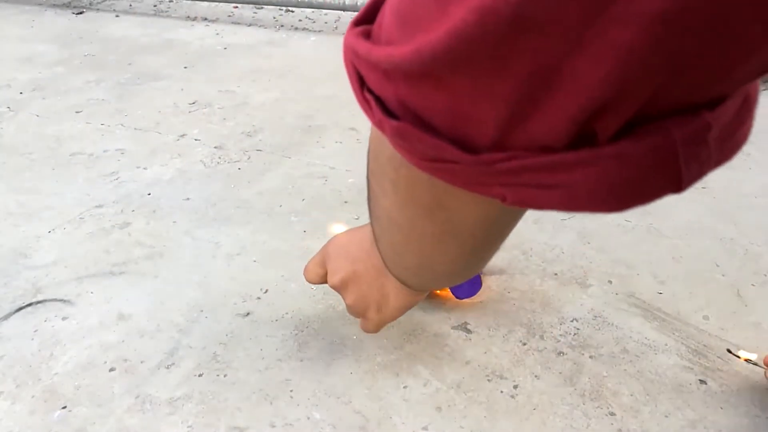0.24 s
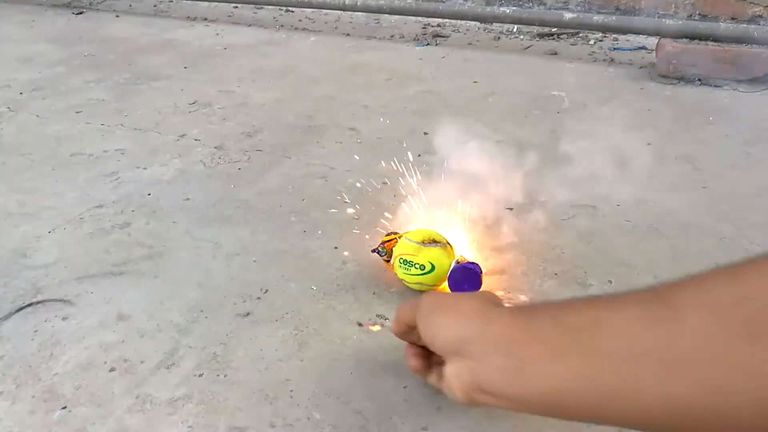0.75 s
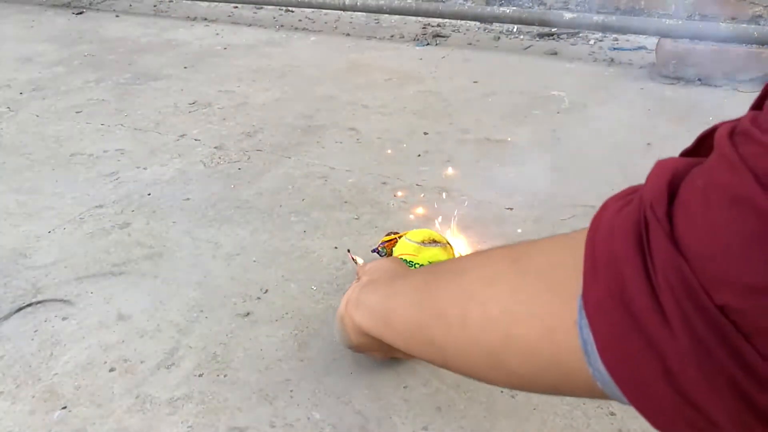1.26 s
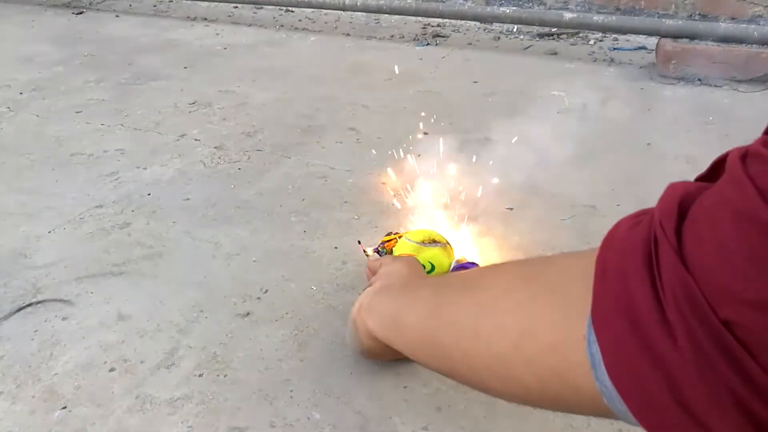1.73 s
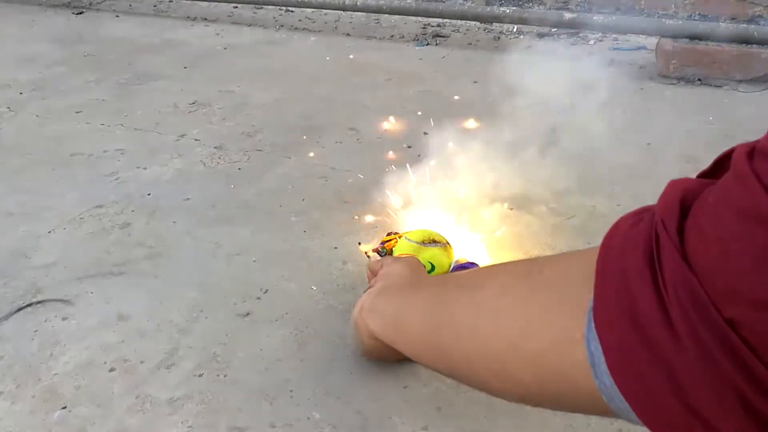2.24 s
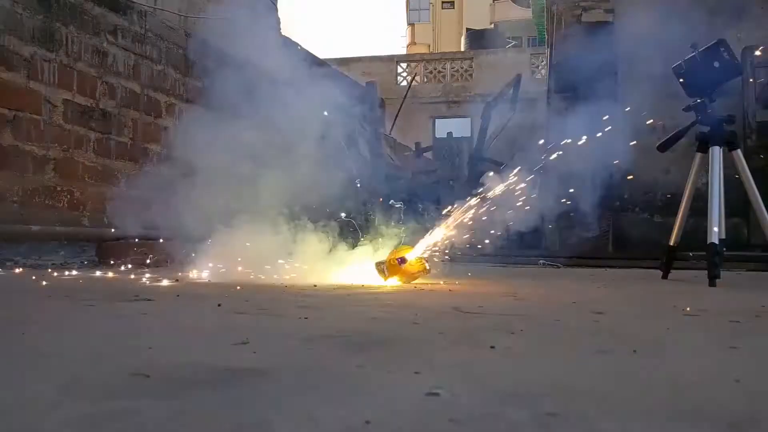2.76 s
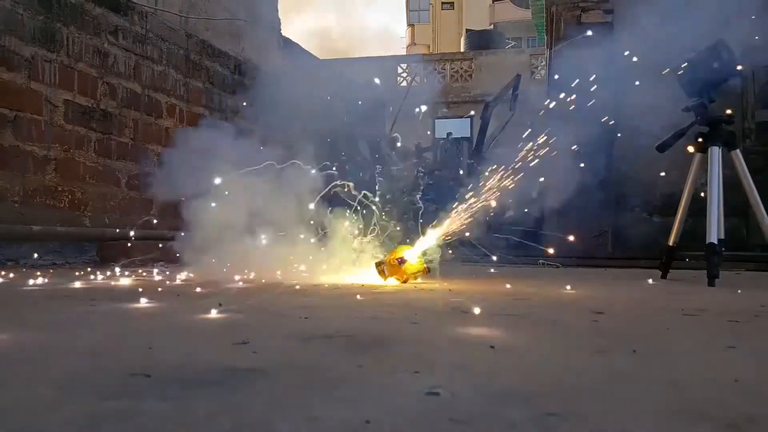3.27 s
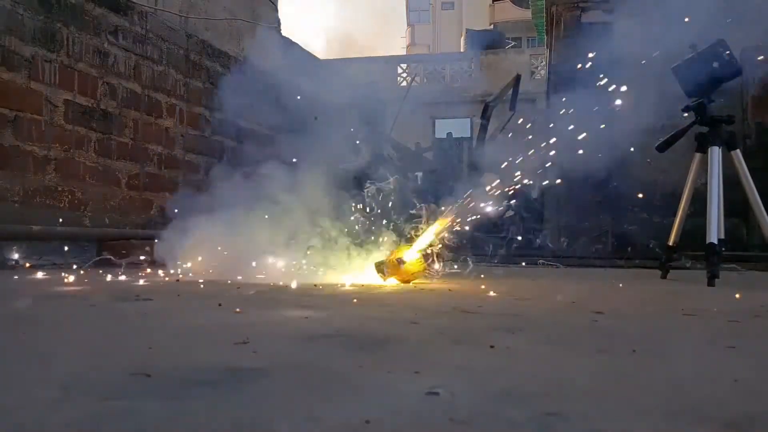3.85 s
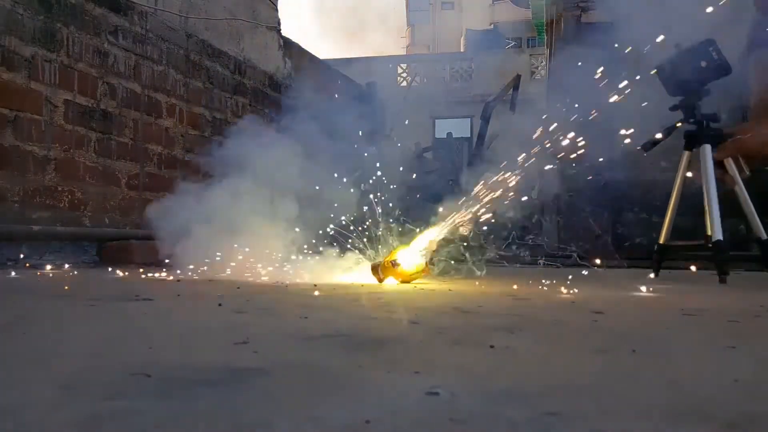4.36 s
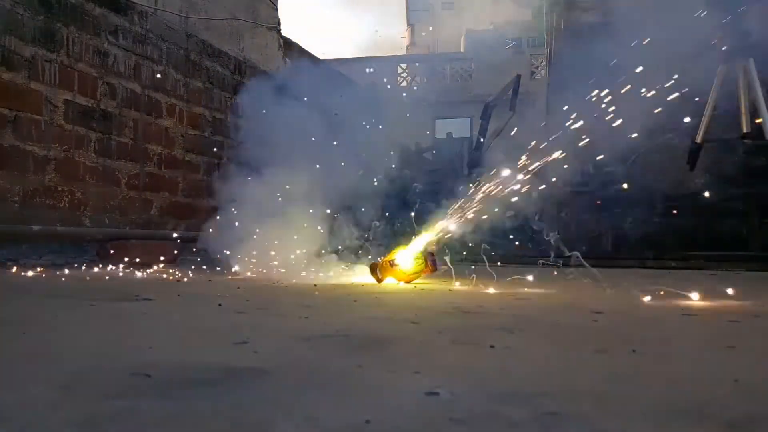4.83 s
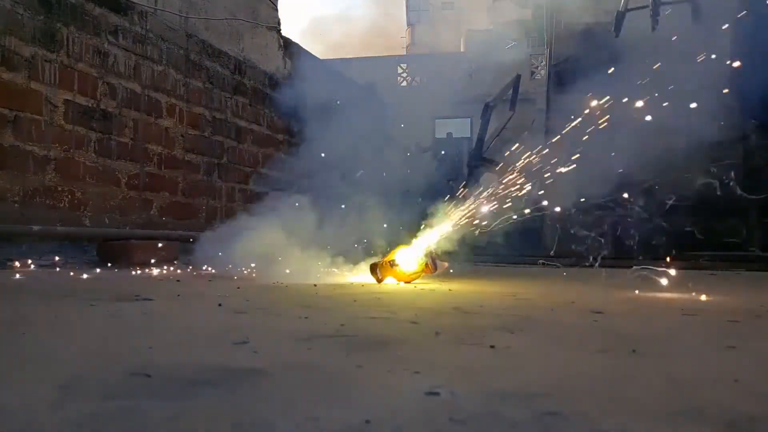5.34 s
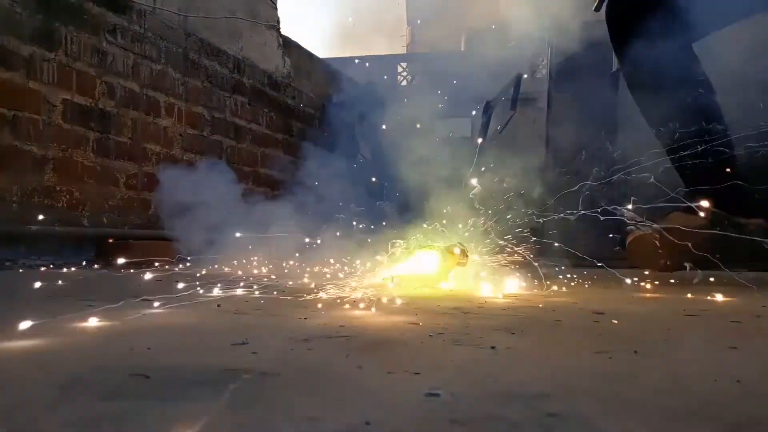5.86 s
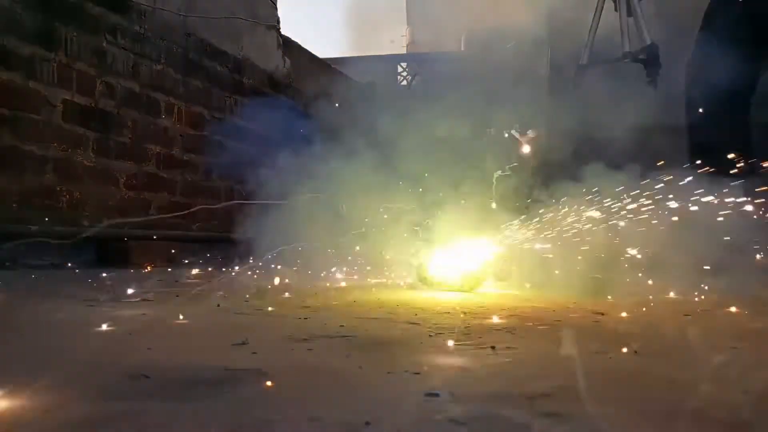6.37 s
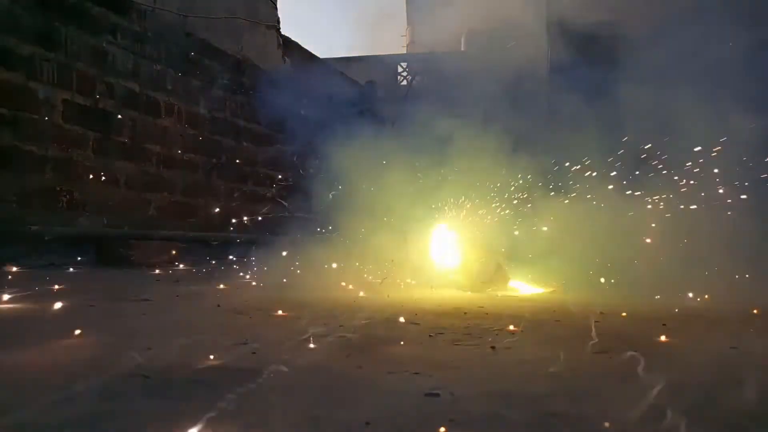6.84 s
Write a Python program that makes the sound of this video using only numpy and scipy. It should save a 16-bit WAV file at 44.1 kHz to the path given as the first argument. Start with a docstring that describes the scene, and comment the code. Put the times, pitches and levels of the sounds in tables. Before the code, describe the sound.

Close outdoors over concrete, a fuse fizzes quietly and a small firework's priming flares in soft, fluttering, raspy puffs that grow stronger. It stops abruptly for a fifth of a second. Then a much louder jet roars and hisses near floor level in a walled yard, with sharp spark snaps. At the end the case tips over and spins, its hiss swishing past the microphone.

```python
"""Quiet outdoor air and a fizzing fuse come first, then the priming of a small firework flares in puffs.
The flame is noise and grain clicks, shaped into bands that rise and fall with each flare.
After a short silence the full jet roars and hisses at floor level: noise bands driven by thrust.
Sparks snap as tiny shocks with dying rings, before and after the silence.
At last the case tips over and spins: a sliding echo makes the jet swish, and its hiss swings past."""
import sys
import numpy as np
from scipy import signal
from scipy.fft import rfft, irfft, next_fast_len
from scipy.io import wavfile
from scipy.ndimage import map_coordinates

SR = 44100
rng = np.random.default_rng(int(sys.argv[2]) if len(sys.argv) > 2 else 0)


def store_pcm(level_fs):
    """Save levels as 16-bit WAV."""
    pcm = np.round(np.clip(level_fs, -1, 1) * 32767).astype(np.int16)
    wavfile.write(sys.argv[1], SR, np.atleast_2d(pcm).T)


N = 313110
LENGTH = next_fast_len(N)
TIME = np.arange(N) / SR
BINS = np.fft.rfftfreq(LENGTH, 1 / SR)  # frequencies in Hz
TIP_S = 5.82  # the case tips over and starts to skid


def gain_of(db):
    """Turns decibels into a plain multiplier."""
    return np.exp(np.asarray(db) * (np.log(10) / 20))


def evened(x):
    """Scales a sound to an average strength (rms) of 1."""
    return x / np.sqrt(np.mean(x ** 2) + 1e-20)


def read(points, hz):
    """Joins (Hz, value) points by straight lines on a log-frequency axis."""
    f, value = np.transpose(points)
    return np.interp(np.log(hz + 1), np.log(f + 1), value)


def curve(points):
    """Joins (s, value) points by straight lines in time."""
    s, value = np.transpose(points)
    return np.interp(TIME, s, value)


def swells(rows):
    """Sums a bell for each (s, length at half height s, height, ..) row; one curve per height column."""
    total = 0
    for s, length, *heights in rows:
        bell = .5 ** ((2 * (TIME - s) / length) ** 2)
        total = total + np.outer(heights, bell)
    return total


def lifted(peaks):
    """Sums (Hz, width Hz, dB) resonances into one lift in dB over all frequencies."""
    return sum(db / (1 + (2 * (BINS - hz) / width) ** 2) for hz, width, db in peaks)


def add(mix, s, sound):
    """Mixes a sound in at time s."""
    part = mix[round(s * SR):][:len(sound)]
    part += sound[:len(part)]


def coloured(x, spectrum, lift_db=0):
    """Filters x by a spectrum and a lift, then scales it to rms 1."""
    gain = gain_of(read(spectrum, BINS) + lift_db)
    return evened(irfft(rfft(x, LENGTH) * gain, LENGTH)[:N])


def waver(rate_hz):
    """Random motion of about rms 1, weak below 6 Hz and fading above rate_hz."""
    step = 32  # one value per 32 samples is enough for slow motion
    t = TIME[::step]
    hz = np.fft.rfftfreq(len(t), step / SR)
    band = hz ** 2 / (hz ** 2 + 6 ** 2) / np.sqrt(1 + (hz / rate_hz) ** 3)
    motion = irfft(rfft(rng.standard_normal(len(t))) * band, len(t))
    return np.interp(TIME, t, evened(motion))


def crackle(per_s, spread_db):
    """Clicks of burning grains at random times; a large spread_db makes a few stand out."""
    count = int(per_s * N / SR)
    place, rarity, sign = rng.random((20000, 3))[:count].T  # at most 20000 clicks in all
    size = gain_of(-spread_db * np.log(rarity + .01))
    return evened(np.bincount((place * N).astype(int), size * np.sign(sign - .5), N))


def gas(grain, per_s, spread_db):
    """Turbulent gas is white noise, here with a share of grain clicks in it."""
    return evened(rng.standard_normal(N) + grain * crackle(per_s, spread_db))


def ring(t, hz, t60):
    """A struck resonance: one tone that dies by 60 dB in t60 seconds."""
    return np.sin(2 * np.pi * hz * t) * np.exp(-np.log(1000) * t / t60)


def yard(x, wet_db):
    """Early echoes off floor and walls, then a short open-air tail of scattered reflections."""
    # Echoes off floor and walls: delay_s [s], gain [times the direct sound]
    echoes = [(.0009, 0.11), (.00275, 0.051), (.0054, 0.088), (.0079, .07), (0.011, .13)]
    # How long the tail takes to die by 60 dB: pitch_hz [Hz], t60_s [s]
    tail_times = [(200, 0.19), (2000, 0.25), (7000, 0.07), (15000, 0.52)]
    t = np.arange(SR // 4) / SR
    taps = rng.choice([-1., 1.], len(t)) * (rng.random(len(t)) < .08) * (t > .004)
    # each frequency band of the tail dies at its own speed
    hz, s, z = signal.stft(taps, SR, nperseg=256)
    decay = gain_of(-60 * s / read(tail_times, hz)[:, None])
    tail = signal.istft(z * decay, SR)[1]
    response = gain_of(wet_db) * tail / np.linalg.norm(tail)
    response[0] += 1  # direct sound
    for delay, gain in echoes:
        response[round(delay * SR)] += gain
    return signal.oaconvolve(x, response / np.linalg.norm(response))[:N]


def spread(a, b):
    """Two unrelated sounds become a left-right pair that is partly alike."""
    # Likeness of left and right: pitch_hz [Hz], likeness [1 = same, 0 or less = unrelated]
    likeness = [(60, 0.91), (150, 1), (380, 0.86), (950, 0.36), (2380, 0.47), (5980, 0.22), (15000, -0.15)]
    # Balance of left against right: pitch_hz [Hz], left_over_right_db [dB]
    balance = [(60, -2.5), (180, 2.5), (550, -6.5), (1650, 0.5), (4970, 4), (15000, 6)]
    same = np.clip(read(likeness, BINS), 0, 1)
    lean_db = read(balance, BINS)
    mid = rfft(a, LENGTH)
    side = rfft(b, LENGTH) * np.sqrt((1 - same) / (1 + same))
    left = (mid + side) * gain_of(lean_db / 2)
    right = (mid - side) * gain_of(-lean_db / 2)
    return irfft(np.array([left, right]), LENGTH)[:, :N]


def flame_gains():
    """Flutter, rasp and fizz of the flame: each flare swells, holds and dies back to the embers."""
    # The priming flares up, at last for good: start_s [s], attack_s [s], hold_s [s], release_s [s],
    # flutter_level_db [dB], rasp_over_flutter_db [dB], fizz_over_flutter_db [dB]
    flares = [(0.24, 0.29, 0.13, .16, -49.5, -21, -10.5), (0.475, 0.098, .005, 0.03, -40, -4.5, -8),
              (0.58, 0.05, .003, 0.018, -34.5, -2, -16), (0.953, .035, .02, 0.13, -53, -1.5, -20),
              (1.02, 0.073, .02, .08, -49.5, -1, -25), (1.202, 0.013, .02, 0.044, -42.5, -2, -29),
              (1.222, 0.058, .005, 0.042, -35, -3, -19.5), (1.293, 0.066, .02, .07, -43.5, -4, -27),
              (1.367, 0.17, 0.02, 0.19, -32.5, 1.5, -16.5), (1.60, 0.079, 0.03, 0.14, -38.5, -2.5, -18.5),
              (1.863, 0.11, 0.067, 0.052, -34.5, 4, -13), (2.03, 0.069, 0.069, .07, -33.5, -2, -16.5),
              (2.135, 0.09, .35, 0.028, -31, 0.5, -14)]
    kindle_s = 0.54  # time that the embers take to start glowing
    embers_db = [-59, -61, -75]  # flutter, rasp and fizz between flares
    lit = np.minimum(TIME / kindle_s, 1) ** 2
    power = np.outer(gain_of(embers_db), lit) ** 2
    for start, attack, hold, release, db, rasp_db, fizz_db in flares:
        rise = (TIME - start) / attack
        fall = 1 - (TIME - start - attack - hold) / release
        opening = np.clip(np.minimum(rise, fall), 0, 1)
        shape = np.sin(np.pi / 2 * opening) ** 2
        power = power + np.outer(gain_of([db, db + rasp_db, db + fizz_db]), shape) ** 2
    # the main charge catches in a bright spit: time s, length s, then the three levels
    catch = swells([(2.596, 0.043, *gain_of([-25.5, -27.5, -33]))])
    return np.sqrt(power + catch ** 2)


def priming():
    """An open flame that flutters and rasps, with the fizz of burning powder, over quiet outdoor air."""
    # Spectra of low buffeting, fuse, flutter, rasp, fizz and air: pitch_hz [Hz], level_db [dB per Hz]
    buffet_spectrum = [(20, -19), (45, -11), (85, 4), (130, -9), (220, -13.5), (1000, -88)]
    fuse_spectrum = [(1000, -38), (3400, -11), (5500, 3.5), (7500, 0.5), (11000, 2), (13000, -7),
                     (15500, -6)]
    flutter_spectrum = [(60, -29), (130, -11), (210, -1), (310, -3.5), (480, -6.5), (720, -5),
                        (1080, -14.5), (1500, -29), (6000, -72)]
    rasp_spectrum = [(200, -42), (600, -17.5), (1100, -8), (1450, 2), (1750, -3), (2100, -7.5),
                     (2600, -9.5), (3100, -12.5), (3700, -22.5), (4400, -26.5), (12000, -58.5)]
    fizz_spectrum = [(300, -50.5), (1500, -21.5), (3300, 5.5), (4500, 0.5), (5400, 2), (7500, -2.5),
                     (10500, -3), (12500, -21), (16000, -24.5)]
    air_spectrum = [(20, -15.5), (45, -4), (70, -11), (120, -6.5), (190, -5), (420, -21.5), (800, -20),
                    (1200, -24.5), (2000, -28), (2800, -22), (3400, -21.5), (4600, -25), (11000, -37.5),
                    (15000, -43.5)]
    # Thin steady bands in the faint background hiss: pitch_hz [Hz], width_hz [Hz], lift_db [dB]
    thin_bands = [(3280, 44, 11.5), (3520, 37, 11), (3950, 70, 6.5), (5400, 90, 4)]
    # Draughts of air make the low buffeting, before its wavering: time_s [s], level_db [dB]
    draughts = [(0.25, -66), (0.38, -60), (0.83, -68), (0.97, -56), (1.1, -67), (1.26, -46), (1.34, -62),
                (1.55, -55.5), (1.92, -62), (2.4, -51), (2.6, -64)]
    # The fuse hisses until it reaches the powder, then sparks begin to spray: time_s [s], level_db [dB]
    fuse_levels = [(0, -67), (.27, -74), (.4, -52.5), (.5, -56.5), (.75, -63.5), (1.05, -66), (1.2, -87),
                   (1.4, -82), (1.6, -60), (1.87, -61.5), (2.3, -53.5), (2.6, -51)]

    flutter, rasp, fizz = flame_gains()
    sputter = waver(rate_hz=48)
    layers = [(buffet_spectrum, gain_of(curve(draughts) + 1.2 * waver(rate_hz=11))),
              (fuse_spectrum, gain_of(curve(fuse_levels))),
              (flutter_spectrum, flutter * gain_of(-1.5 + 1.35 * sputter)),
              (rasp_spectrum, rasp * gain_of(-1.5 + 2.4 * sputter)),
              (fizz_spectrum, fizz * gain_of(0.7 * sputter))]
    air_lift_db = lifted(thin_bands)
    pair = []
    for _ in range(2):  # the same levels with fresh noise, to be spread left and right
        flame = np.zeros(N)
        for spectrum, gain in layers:
            flame += coloured(gas(grain=0.76, per_s=1000, spread_db=1.5), spectrum) * gain
        air = coloured(rng.standard_normal(N), air_spectrum, air_lift_db) * gain_of(-59.5)
        pair.append(yard(flame, wet_db=-8.5) + air)
    return spread(*pair)


def snaps():
    """Each bursting spark is a tiny shock with a bright ring, a lower body and a spit of fragments."""
    # Sparks that burst: start_s [s], level_db [dB, peak before the yard's echoes],
    # body_db [dB, lower body against bright ring, before a fixed offset]
    bursts = [(2.47, -23.5, 3), (2.573, -20, 7), (2.5985, -14.5, 0), (2.8578, -14.5, 10), (2.867, -15, -4),
              (2.984, -8, 4), (3.014, -13.5, 12), (3.037, -15, -1), (3.0702, -8.5, 0), (3.08, -9.5, 7),
              (3.1, -13, 9), (3.1272, -13, 4), (3.1545, -7, -16), (3.1752, -10, -6), (3.2285, -5, 5),
              (3.2557, -11, 10), (3.3147, -17, -7), (3.4403, -6.5, 14), (3.4709, -13, -4), (3.509, -5.5, 0),
              (3.5514, -12, 9), (3.571, -4, -9), (3.5906, -10.5, 7), (3.6175, -13, -6), (3.667, -11, 7),
              (3.707, -10, 1), (3.847, -2.5, 7), (4.174, -2, 12), (4.358, -8, 11), (4.3826, -8.5, 4),
              (4.6823, -5.5, 10), (4.9543, -3.5, -6), (5.068, -8, -8), (5.148, -3, 9), (5.1892, -6.5, 10),
              (5.371, -4.5, 2), (6.757, -9, 0), (6.8425, -7, -8), (6.96, -3, -8)]
    ring_spread = .025  # no two sparks ring quite alike: typical share by which pitch varies
    out, t = np.zeros(N), np.arange(SR // 40) / SR
    no_bass = signal.butter(2, 1100, "high", fs=SR)
    for (s, peak_db, body_db), chance in zip(bursts, rng.standard_normal((len(bursts), len(t)))):
        size = 1 + ring_spread * chance[-1]
        shock = 1.26 * ring(t, hz=11500, t60=0.00026)
        bright = ring(t, hz=7650 * size, t60=0.0031)
        body = gain_of(body_db - 5.0) * ring(t, hz=3200 * size, t60=0.0019)
        snap = shock + bright - body
        fragments = 0.031 * chance * np.exp(-t / 0.0018)
        # every fragment also repeats the snap faintly
        scattered = signal.fftconvolve(snap, fragments)[:len(t)]
        burst = signal.lfilter(*no_bass, snap + scattered + 7.7 * fragments)
        add(out, s, gain_of(peak_db) * burst / abs(burst).max())
    return yard(out, wet_db=-15.5)


def jet_levels():
    """Roar, rush, hiss and sizzle in dB: all follow thrust, spurts and clogs; the upper three also aim."""
    # Pressure in the case builds as the burning face widens: time_s [s], thrust_db [dB, scaled per band]
    thrust_points = [(2.81, -13), (2.86, -10.5), (3.22, -12.5), (3.33, -9), (3.6, -9.5), (3.89, -7),
                     (3.98, -2.5), (4.36, -3), (4.48, 1), (4.66, 1.5), (4.79, 3), (4.92, -0.5), (5.35, -1),
                     (5.5, 3), (6.06, -2), (6.3, 5.5), (6.56, 0), (7.1, 0)]
    # Slag blocks the nozzle for a moment: centre_s [s], length_s [s, at half height],
    # drop_db [dB, scaled per band], roar_drop_db [dB]
    clogs = [(3.232, 0.041, 3.5, 10), (3.88, 0.016, 6, 5), (4.155, 0.024, 4.5, 5.5), (4.57, 0.047, 5, 2),
             (4.672, 0.05, 9.5, 8.5), (5.1, 0.019, 0.5, -1), (5.25, 0.023, 4, 0), (5.865, 0.071, 10, 5.5),
             (6.958, 0.029, 11, 4)]
    # The jet spurts as loose powder goes up: centre_s [s], length_s [s, at half height],
    # rise_db [dB, scaled per band], roar_rise_db [dB]
    spurts = [(2.92, 0.014, -5, 7), (3.425, 0.03, 5.5, 6), (3.72, 0.018, 5.5, 4.5), (4.525, 0.028, 2, 0.5),
              (5.04, 0.087, 1.5, 2), (5.805, 0.043, 4.5, 6.5), (6.595, 0.052, -2, 3)]
    # The spinning nozzle swings past the listener: centre_s [s], length_s [s, at half height],
    # treble_rise_db [dB, scaled per band]
    swings = [(5.98, 0.087, 3), (6.155, 0.068, 10), (6.505, 0.058, 12.5), (6.635, 0.16, 7),
              (6.755, 0.05, 11.5), (6.915, 0.065, 12), (7.05, 0.075, 9)]
    thrust = curve(thrust_points)
    aim = swells(swings)[0]
    surge, roar_surge = swells(spurts) - swells(clogs)
    # once tipped, the jet scours the floor: more roar, less hiss
    tipped = np.clip((TIME - TIP_S) / 0.047, 0, 1)
    floor_roar_db, floor_hiss_db = 2.5 * tipped, -5 * tipped
    thickening_db = 2.0 * (TIME - TIP_S)  # the spray of sparks grows by 2 dB per second
    roar_db = -25 + 0.66 * thrust + roar_surge + floor_roar_db
    rush_db = -25 + thrust + surge + 0.23 * aim
    hiss_db = -29 + 1.19 * thrust + 1.37 * surge + aim + floor_hiss_db
    sizzle_db = -43 + .25 * thrust + .9 * surge + 1.1 * aim + floor_hiss_db + thickening_db
    return roar_db, rush_db, hiss_db, sizzle_db


def jet():
    """Gas leaves the nozzle in uneven gusts, which each band of noise follows by its own amount."""
    # Spectra from low to high, then of the ticking sparks: pitch_hz [Hz], level_db [dB per Hz]
    drone_spectrum = [(30, -33), (60, -28), (90, -5.5), (130, -16.5), (175, 1.5), (260, -0.5), (310, -12),
                      (400, -0.5), (600, -4), (1200, -38), (5000, -70)]
    roar_spectrum = [(30, -45), (70, -40), (130, -11.5), (200, -9), (300, -2.5), (480, 3.5), (750, 4),
                     (1300, 0.5), (1800, -3.5), (2400, -6.5), (4000, -33), (9000, -70)]
    rush_spectrum = [(300, -63), (1000, -14), (1800, -1.5), (2350, -4), (2750, 4.5), (3100, -4),
                     (3600, 2.5), (4000, -6.5), (4350, -6), (5100, -11.5), (5900, -9.5), (6600, -12),
                     (9000, -20), (13000, -60)]
    hiss_spectrum = [(1000, -57), (3500, -11), (5200, -10), (6200, -7.5), (6800, 0), (7400, 1.5),
                     (7950, -3.5), (8600, -16.5), (10000, -18.5), (13000, -44)]
    sizzle_spectrum = [(3000, -35), (5500, -21), (8500, 7), (10000, -1), (11500, -.5), (14000, -1.5),
                       (15300, 0), (16000, -6.5)]
    tick_spectrum = [(100, -61), (1500, -23), (3300, 1), (5500, -25), (7500, 6), (9500, -2.5), (15500, -10)]
    # Resonances of the walled corner round the jet: pitch_hz [Hz], width_hz [Hz], lift_db [dB]
    corner = [(206, 17, 6.5), (347, 22, 6), (538, 28, 1), (600, 26, 2), (836, 30, 4.5), (950, 63, 1.5),
              (1094, 9.9, 6.5), (1314, 65, 2.5), (1425, 70, 4.5), (2450, 460, 3.5), (2750, 60, -5),
              (3460, 110, -0.5)]
    # Small sparks tick between the big snaps: time_s [s], level_db [dB]
    shower = [(2.81, -53), (3.1, -36.5), (3.62, -57), (3.95, -51), (4.3, -47), (4.7, -64), (5.5, -36),
              (5.85, -50), (7.1, -53)]

    roar_db, rush_db, hiss_db, sizzle_db = jet_levels()
    gusts = waver(rate_hz=16.4)
    clogging = waver(rate_hz=16)  # slag narrows and clears the nozzle
    corner_db = lifted(corner)

    roar = coloured(gas(grain=0.62, per_s=1200, spread_db=2.5), roar_spectrum, corner_db)
    roar *= gain_of(roar_db + 0.65 * gusts)
    # the flame's low body follows the gusts but not the thrust
    drone = coloured(rng.standard_normal(N), drone_spectrum) * gain_of(-36.5 + 2.7 * gusts)
    rush = coloured(gas(grain=0.55, per_s=2200, spread_db=4), rush_spectrum, corner_db)
    rush *= gain_of(rush_db + 1.0 * gusts + 0.19 * clogging)
    hiss = coloured(gas(grain=0.58, per_s=2100, spread_db=-1), hiss_spectrum)
    hiss *= gain_of(hiss_db + 1.8 * gusts + 1.06 * clogging)
    sizzle = coloured(gas(grain=0.36, per_s=3000, spread_db=11), sizzle_spectrum)
    sizzle *= gain_of(sizzle_db + 1.5 * gusts + 1.6 * clogging)
    ticks = coloured(crackle(per_s=180, spread_db=7.5), tick_spectrum) * gain_of(curve(shower))
    return yard(roar + drone + rush + hiss + sizzle + ticks, wet_db=-11)


def tumbling(x):
    """As the case rolls, the nozzle's height changes, so its floor echo slides and the jet swishes."""
    rolling = np.clip((TIME - TIP_S) / 0.36, 0, 1)
    delay_s = 0.000552 * np.exp(0.52 * waver(rate_hz=8.0))
    echo = .4 * rolling
    late = map_coordinates(x, [np.arange(N) - delay_s * SR], order=3)
    return (x + echo * late) / np.sqrt(1 + echo ** 2)


def knock():
    """The skidding case gives a short low bump, a quickly dying tone."""
    out = np.zeros(N)
    bump = ring(np.arange(SR // 5) / SR, hz=101, t60=0.037)
    add(out, 6.9595, gain_of(-18) * bump)
    return signal.lfilter(*signal.butter(2, 40, "high", fs=SR), out)


def scene():
    """The lighting is heard in stereo from above and stops short; the full burn in mono from the floor."""
    # The short silence between lighting and full burn: start_s [s], end_s [s]
    silence = (2.603, 2.805)
    sparks = snaps()
    late = np.maximum(TIME - silence[0], 0)
    # a faint remnant dies within a few hundredths of a second
    lighting = np.where(late > 0, gain_of(-15 - 1430 * late), 1)
    burning = np.clip((TIME - silence[1]) / .002, 0, 1)
    full_burn = tumbling(jet()) + sparks + knock()
    return (priming() + sparks) * lighting + full_burn * burning


def record(dry):
    """A steep low-pass filter takes away everything well above 15.7 kHz."""
    low_pass = signal.firwin(511, 15700, window=("kaiser", 9), fs=SR)
    return signal.oaconvolve(dry, low_pass[None], "same")


dry = scene()
out = record(dry)
store_pcm(out)
```